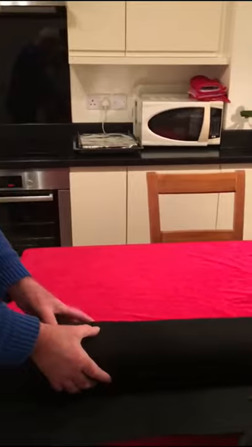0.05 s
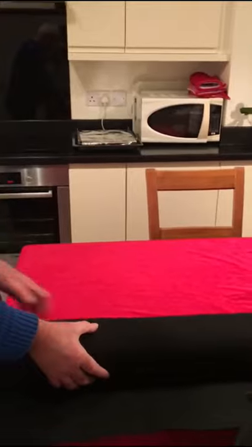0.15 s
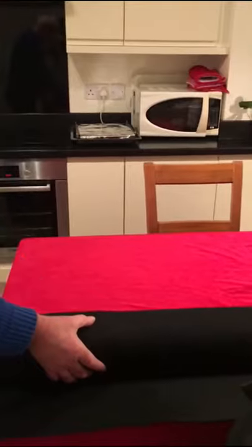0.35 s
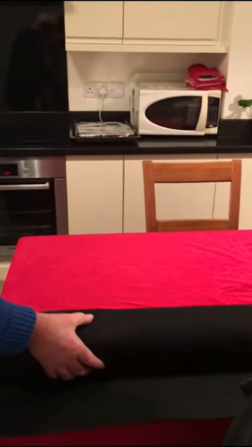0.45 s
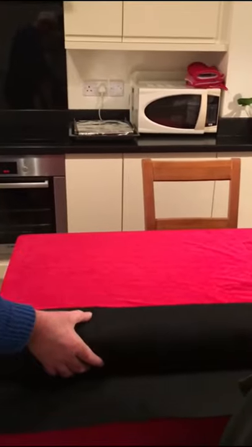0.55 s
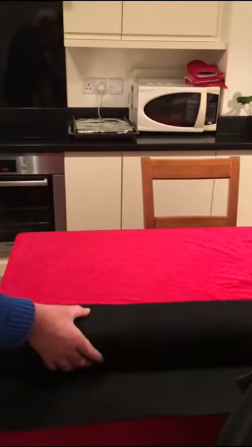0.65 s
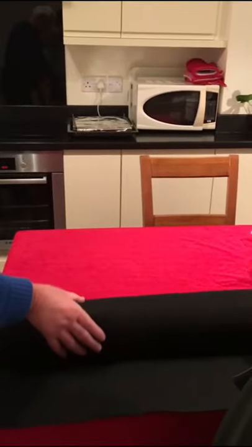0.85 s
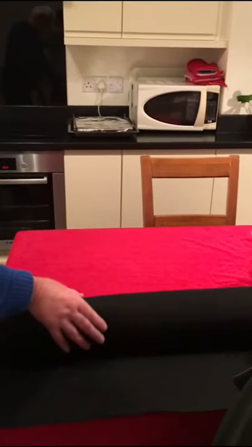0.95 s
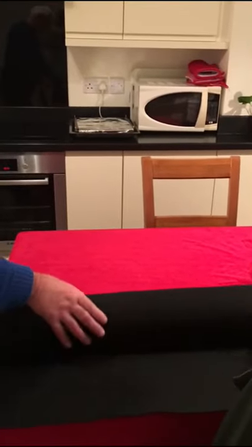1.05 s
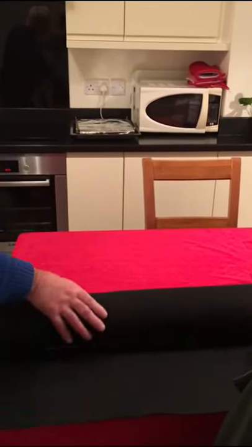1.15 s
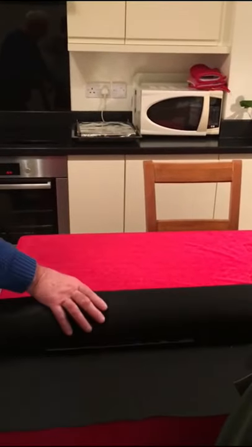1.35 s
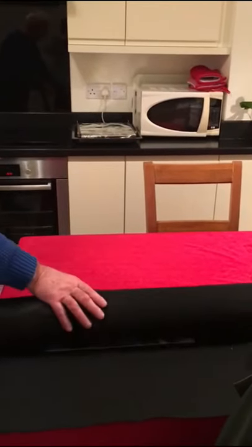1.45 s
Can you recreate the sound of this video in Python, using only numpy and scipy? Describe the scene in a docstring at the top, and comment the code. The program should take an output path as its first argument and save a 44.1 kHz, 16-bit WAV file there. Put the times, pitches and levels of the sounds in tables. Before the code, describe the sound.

A thick rolled mat scuffs, then its flap slaps down on a wooden table.

```python
"""Turning over a rolled mat

A thick rolled mat is turned over on a cloth-covered wooden table in a quiet kitchen. The roll
scuffs and squeaks, then its loose flap lands with a slap and soft thumps that ring the table.
Hands slide faintly over the mat; the hard room rings on over a low appliance hum."""
import sys
import numpy as np
from scipy import signal
from scipy.fft import rfft, irfft
from scipy.io import wavfile

SR = 44100
rng = np.random.default_rng(int(sys.argv[2]) if len(sys.argv) > 2 else 0)


def digitize_waveform(pressure):
    """Quantize a signal to 16-bit integers and store it at the path in sys.argv[1].

    Rows of a 2-D input are taken as channels; values are limited to [-1, 1].
    """
    field = np.atleast_2d(pressure).T
    bounded = np.clip(field, -1, 1)
    quanta = np.round(bounded * 32767).astype(np.int16)
    wavfile.write(sys.argv[1], SR, quanta)


N = 66150


def undb(db):
    """Turn decibels into a number to multiply by."""
    return 10 ** (np.asarray(db) / 20)


def unit(x):
    """Scale to an average (rms) level of 1."""
    return x / np.sqrt(np.mean(np.abs(x) ** 2))


def seconds():
    """The time of every sample."""
    return np.arange(N) / SR


def bins():
    """The frequencies in Hz at which filters are described."""
    return np.maximum(np.arange(N + 1) * SR / (2 * N), 1)


def along(points, hz):
    """Read between (Hz, value) points, with octaves evenly spaced."""
    freqs, values = np.array(points).T
    return np.interp(np.log(hz), np.log(freqs), values)


def through(x, response):
    """Pass a sound through a filter."""
    return irfft(rfft(x, 2 * N) * response)[:N]


def colour(points, tilt_db=0):
    """A filter from (Hz, dB) points, brightened by tilt_db per octave."""
    gain = undb(along(points, bins()) + tilt_db * np.log2(bins()))
    cepstrum = irfft(np.log(gain))
    # Fold it so the filter never sounds before its input.
    cepstrum[1:N] *= 2
    cepstrum[N + 1:] = 0
    return np.exp(rfft(cepstrum))


def resonance(hz, width):
    """A filter that favours one pitch."""
    return 1 / (1 + 1j * hz / width * (bins() / hz - hz / bins()))


def noise_band(hz, width):
    """Noise gathered around one frequency."""
    return unit(through(rng.standard_normal(N), resonance(hz, width) ** 2))


def grains(per_second=3500, spread_db=3.5):
    """Rubbing is a crowd of tiny slips of uneven size."""
    slips = rng.random(N) < per_second / SR
    signs = rng.choice([-1, 1], N)
    sizes = undb(spread_db * np.minimum(rng.exponential(size=N), np.pi))
    return unit(slips * signs * sizes)


def contacts(rows, tone):
    """Bursts of slips that rise and fade, coloured by the mat and its hollow roll."""
    # The hollow roll's rings. Each row: pitch in Hz, width in Hz, level in dB.
    roll_rings = [(931.4, 32, -3.5), (1270, 23, -16), (1561, 32, 1.5), (1850, 35, -5), (2395, 250, -8.5),
                  (6700, 400, -12)]
    roll = 1 + sum(undb(db) * resonance(hz, width) for hz, width, db in roll_rings)
    out = np.zeros(N)
    for start, db, rise, fade, tilt_db in rows:
        age = seconds() - start
        shape = np.clip(age / rise, 0, 1) * np.exp(-np.maximum(age - rise, 0) / fade)
        out += undb(db) * through(grains() * shape, unit(roll * colour(tone, tilt_db)))
    return out


def flap_slap():
    """The loose flap lands in a quick run of hits."""
    # Each row: start in seconds, level in dB, rise and fade in seconds, brightness in dB per octave.
    hits = [(.365, -41, 0.0022, 0.02, 3.2), (.374, -35, 0.0019, 0.011, -3),
            (.384, -28.5, 0.0029, 0.013, 2.5), (.394, -36.5, 0.0015, 0.02, -0.5),
            (.413, -44, .002, 0.014, 0.5), (.430, -43, 0.0084, 0.024, 3.5)]
    # The slap's tone. Each row: frequency in Hz, level in dB.
    tone = [(30, -28), (100, -3.5), (400, 2.5), (650, -5.5), (1400, 3), (2500, -1.5), (3400, -8.5),
            (5000, -15.5), (6800, -13.5), (8000, -22), (12000, -30)]
    return contacts(hits, tone)


def table_thumps(peak_cycles=0.57, thud_db=-6, ring_db=-53.5, low_cut_hz=40):
    """The roll's weight lands in short, dull thuds that ring the table top."""
    # Each row: start in seconds, relative level in dB, pitch of the thud in Hz.
    landings = [(0.163, -49.5, 109), (0.178, -54, 87), (.210, -43, 273), (.226, -39.5, 184),
                (0.26, -42.5, 108), (0.367, -25.5, 278), (0.3761, -26.5, 243), (0.3891, -21.5, 201),
                (0.3932, -28, 146), (.414, -34, 194), (0.4293, -29.5, 155), (0.458, -39, 196),
                (.484, -44, 168), (0.53, -43, 113), (1.060, -49.5, 620), (1.184, -48, 760),
                (1.249, -56.5, 80)]
    # The wood's own notes. Each row: pitch in Hz, relative level in dB, seconds to fade by 60 dB.
    wood_notes = [(80, -8, 0.54), (141.8, -1.5, 0.23), (167.2, -6.5, 0.3), (214.5, -8, 0.47),
                  (253.8, -1.5, 0.38), (314, -8.5, 0.38), (334.3, -0.5, 0.38), (389, -7, 0.56),
                  (500, -6, 0.6)]
    t, thuds = seconds(), np.zeros(N)
    for start, db, hz in landings:
        cycles = hz * np.maximum(t - start, 0)
        shape = cycles / peak_cycles * np.exp(2 - 2 * cycles / peak_cycles)
        thuds += undb(db) * shape * np.sin(2 * np.pi * cycles)
    ring = sum(undb(db) * 1000 ** (-t / fade) * np.cos(2 * np.pi * hz * t) for hz, db, fade in wood_notes)
    # The table gives little deep bass to the air.
    bass_cut = 1 / (1 - 1j * low_cut_hz / bins() - (low_cut_hz / bins()) ** 2)
    return through(thuds, bass_cut * (undb(thud_db) + undb(ring_db) * rfft(ring, 2 * N)))


def roll_scuffs():
    """The roll rubs briefly as it turns."""
    # Each row: start in seconds, level in dB, rise and fade in seconds, brightness in dB per octave.
    rubs = [(.165, -50, 0.017, 0.018, -1.5), (.2095, -43, 0.0016, 0.026, -2.5),
            (.218, -41, 0.0036, 0.022, 0), (.2585, -36, 0.00072, 0.016, 0.5),
            (.272, -46.5, 0.0033, 0.085, -0.5), (1.385, -61.5, 0.044, 0.031, 0)]
    # The scuff's tone. Each row: frequency in Hz, level in dB.
    tone = [(40, -1), (150, -11.5), (400, -3.5), (600, -6.5), (1300, 0.5), (2200, -8), (3500, -10.5),
            (6200, -17), (9000, -23.5), (12000, -34.5)]
    return contacts(rubs, tone)


def squeaks(wobble=0.026):
    """The rubbery surface sticks and slips, chirping at an unsteady pitch."""
    # Each row: start in seconds, level in dB, length in seconds, pitch in Hz.
    chirps = [(.167, -50, 0.015, 1780), (0.206, -47, .011, 1350), (.216, -47.5, 0.0062, 6000),
              (.258, -33, 0.01, 1480)]
    out = np.zeros(N)
    for start, db, length, hz in chirps:
        pitch = hz * (1 + wobble * noise_band(hz=133, width=400))
        shape = np.sin(np.pi * np.clip((seconds() - start) / length, 0, 1))
        out += undb(db) * shape * np.sin(2 * np.pi * np.cumsum(pitch) / SR)
    return out


def hands(waver_db=1.25):
    """Palms rub the mat with a fine, wavering hiss that swells with each sweep."""
    # Each row: middle in seconds, level in dB, half length in seconds, brightness in dB per octave.
    sweeps = [(.01, -66.5, 0.018, 0.5), (0.077, -66, 0.038, 1), (.145, -62, 0.039, 3.5),
              (1.095, -71.5, 0.023, 3.5), (1.143, -72.5, 0.04, -0.5), (1.23, -69.5, 0.054, 4),
              (1.361, -71, 0.047, 1), (1.483, -69, 0.029, 0)]
    # The rubbing's tone. Each row: frequency in Hz, level in dB.
    tone = [(100, -11), (500, -15), (1200, -1), (2200, 2.5), (3600, 0), (5000, -7.5), (9000, -11),
            (12000, -20)]
    out = np.zeros(N)
    for middle, db, half, tilt_db in sweeps:
        swell = np.exp(-.5 * ((seconds() - middle) / half) ** 2)
        out += undb(db) * swell * unit(through(grains(), colour(tone, tilt_db)))
    return out * undb(waver_db * noise_band(hz=45, width=27))


def kitchen(gap_s=0.0055):
    """A filter for the room's echo, which dies away at its own rate in each band."""
    # Each row: frequency in Hz, seconds for the echo to fade by 60 dB.
    fades = [(80, 0.6), (170, 0.43), (300, 0.51), (700, 0.58), (1800, 0.47), (3000, 0.39), (6000, 0.34),
             (12000, 0.32)]
    t, noise, tail = seconds(), rng.standard_normal(N), np.zeros(N)
    for hz, fade in fades:
        band = along([(other, float(other == hz)) for other, _ in fades], bins())
        tail += through(noise, band) * 1000 ** (-t / fade)
    tail *= t > gap_s
    return rfft(tail / np.linalg.norm(tail), 2 * N)


def kitchenware(fade_s=1.3):
    """A filter for hard things on the counter that ring along with the mat."""
    # Each row: pitch in Hz, width in Hz, relative level in dB.
    ware_rings = [(1640, 140, -4.5), (1927, 125, -4.5), (2913, 220, -7)]
    bands = sum(undb(db) * resonance(hz, width) ** 2 for hz, width, db in ware_rings)
    ring = through(rng.standard_normal(N), bands) * 1000 ** (-seconds() / fade_s)
    return rfft(ring / np.linalg.norm(ring), 2 * N)


def background(air_db=-64):
    """An appliance hums low in the still room air."""
    # The hum's notes. Each row: pitch in Hz, width in Hz, level in dB.
    hum_notes = [(41.1, 5.3, -68), (114.35, 6.7, -70.5)]
    # The air's tone. Each row: frequency in Hz, relative level in dB.
    air_tone = [(20, -15), (40, -13.5), (80, -3), (150, -12), (350, -12), (520, -21), (700, -16),
                (1600, -21), (3000, -28), (6000, -33), (10000, -36.5), (12000, -42)]
    hum = sum(undb(db) * noise_band(hz, width) for hz, width, db in hum_notes)
    air = unit(through(rng.standard_normal(N), colour(air_tone)))
    return hum + undb(air_db) * air


def scene(mat_echo_db=-4, table_echo_db=-9.5, ware_db=-27.5):
    """Mat, hands and table, heard directly and through the room."""
    room = kitchen()
    mat = roll_scuffs() + flap_slap() + squeaks() + hands()
    out = through(mat, 1 + undb(mat_echo_db) * room + undb(ware_db) * kitchenware())
    out += through(table_thumps(), 1 + undb(table_echo_db) * room)
    return (out + background())[None]


def record(dry):
    """Drop the deepest rumble and cut the highest treble steeply."""
    bottom_hz, top_hz = 24, 12000
    wet = signal.sosfilt(signal.butter(4, bottom_hz, "high", fs=SR, output="sos"), dry)
    return signal.sosfilt(signal.ellip(10, .2, 70, top_hz, fs=SR, output="sos"), wet)


dry = scene()
out = record(dry)
digitize_waveform(out)
```